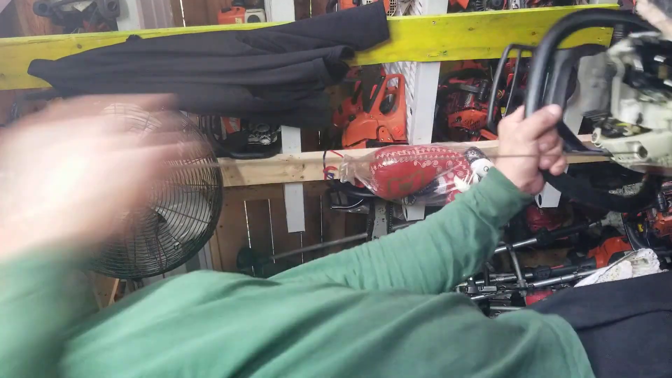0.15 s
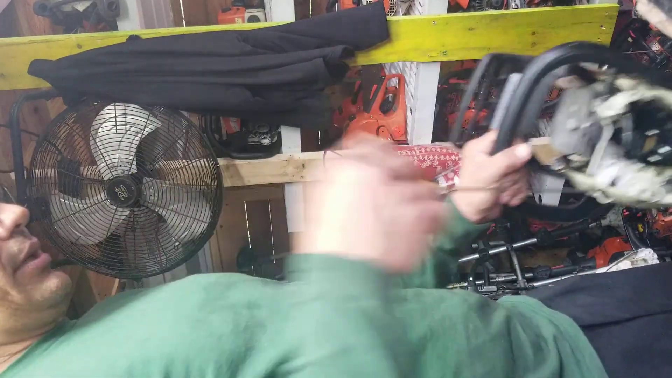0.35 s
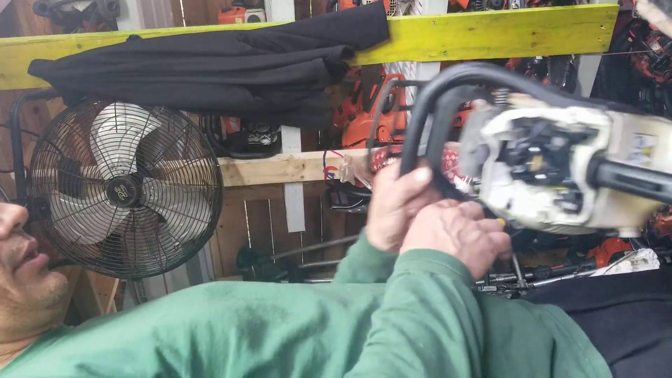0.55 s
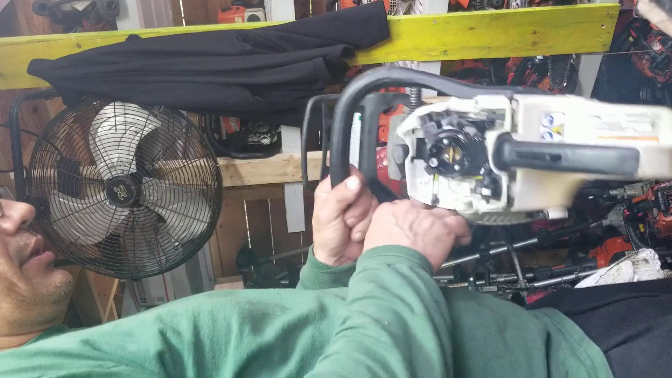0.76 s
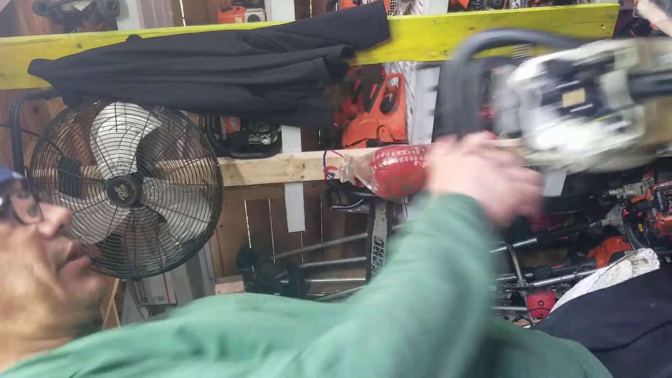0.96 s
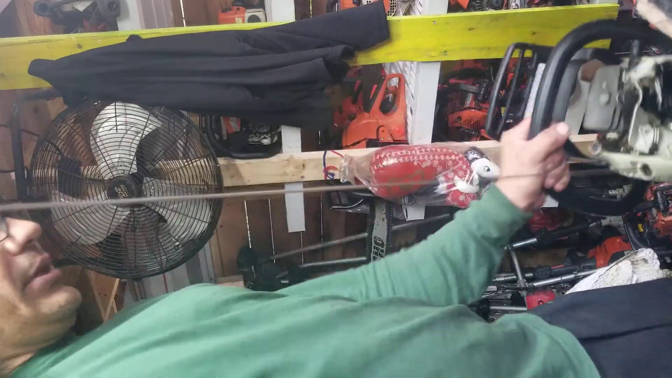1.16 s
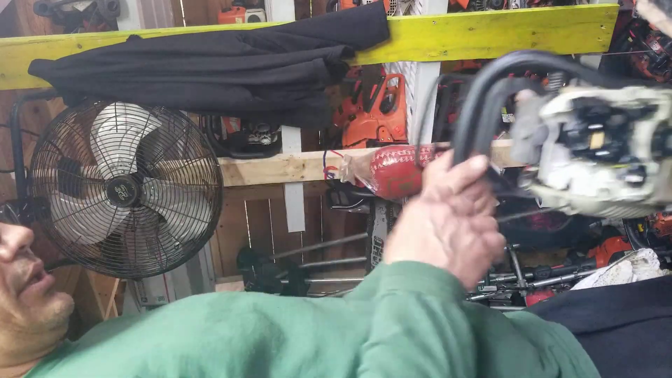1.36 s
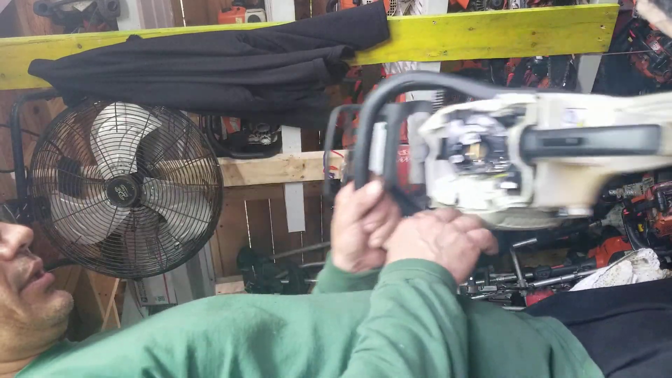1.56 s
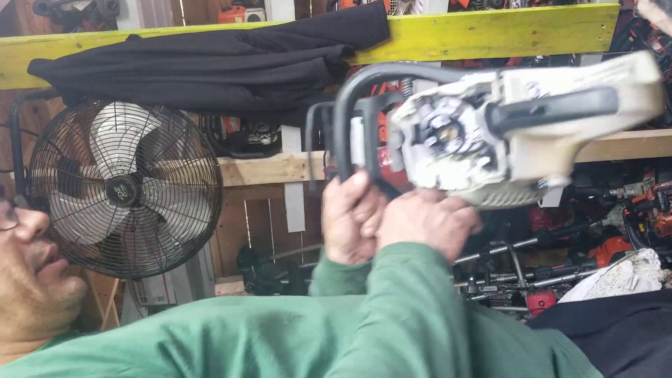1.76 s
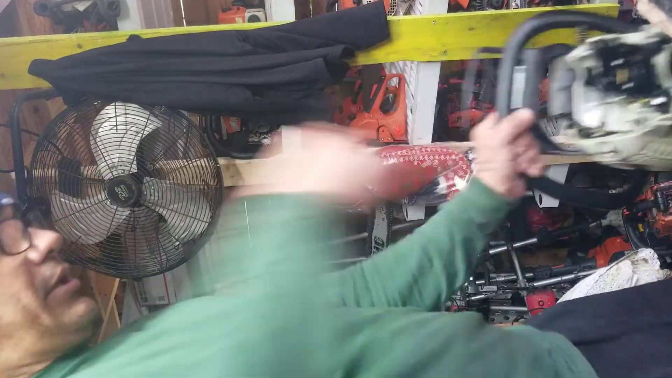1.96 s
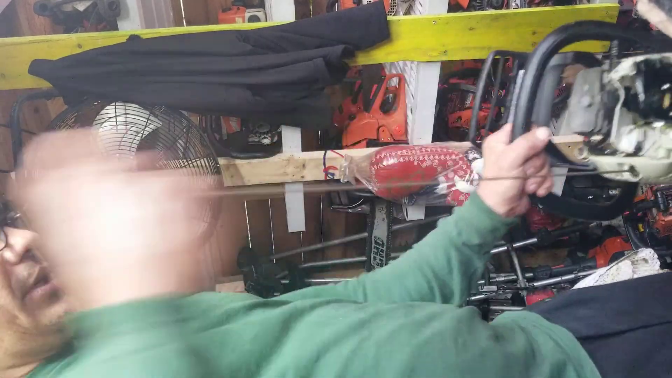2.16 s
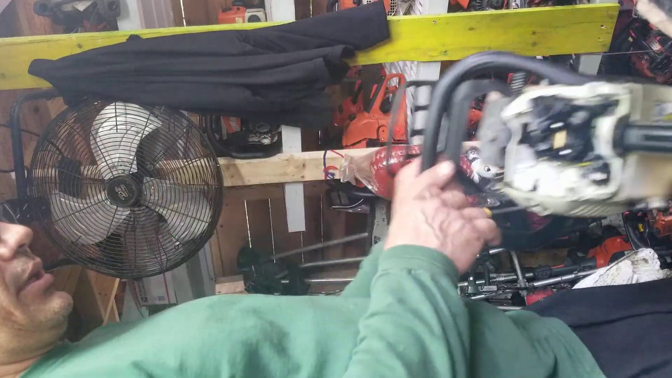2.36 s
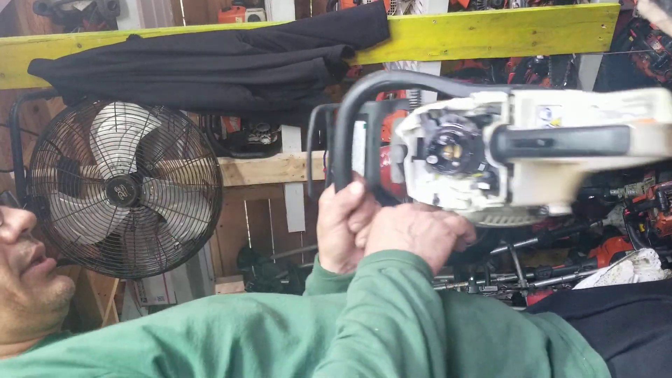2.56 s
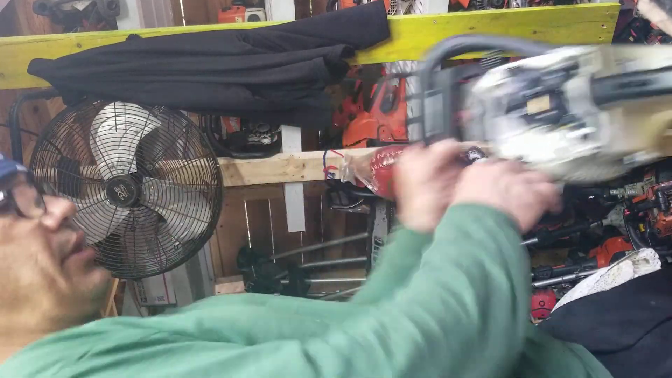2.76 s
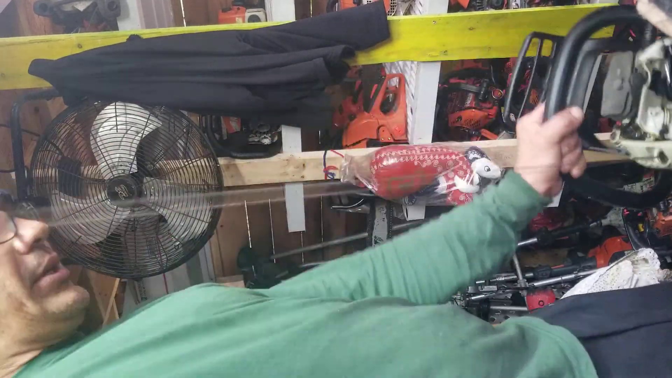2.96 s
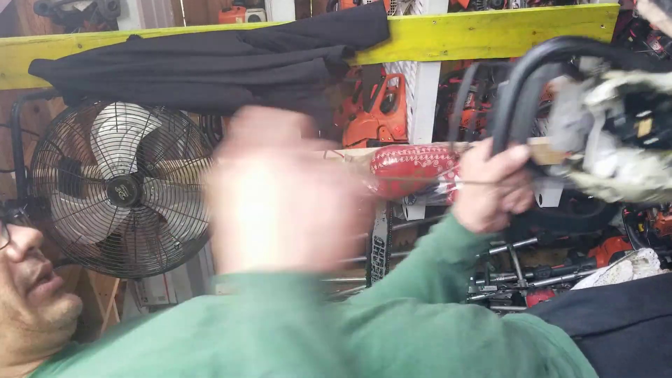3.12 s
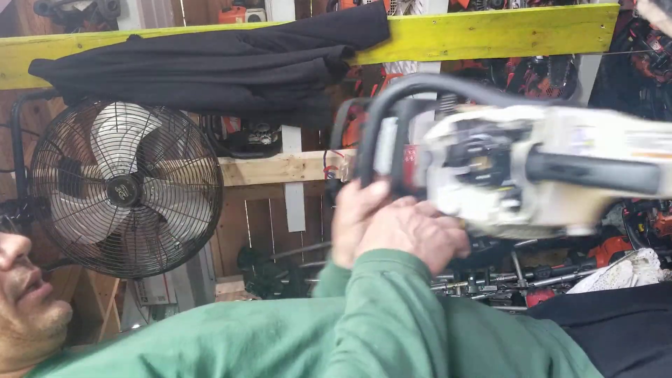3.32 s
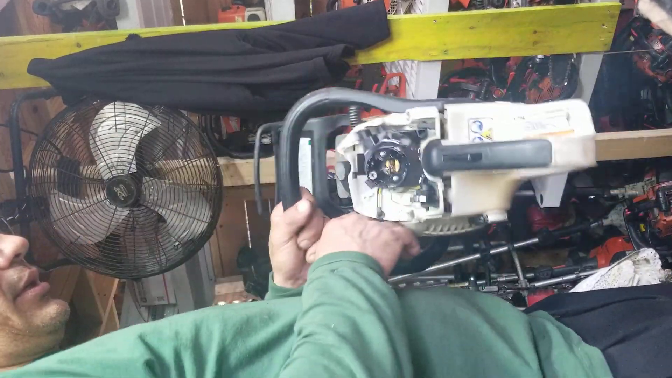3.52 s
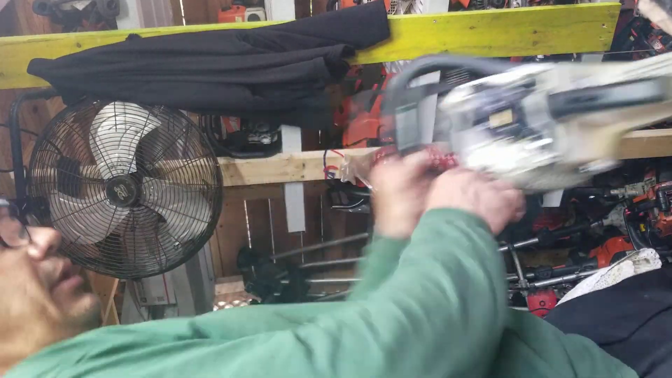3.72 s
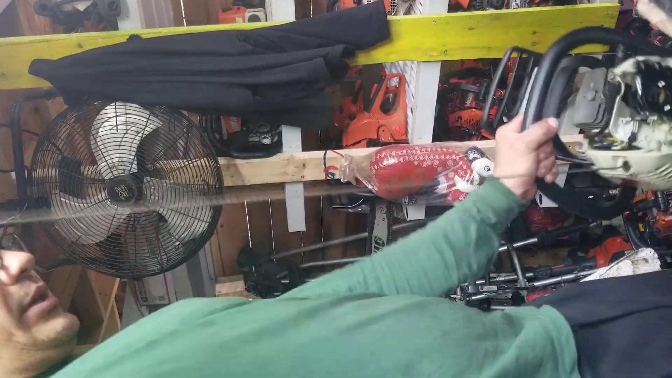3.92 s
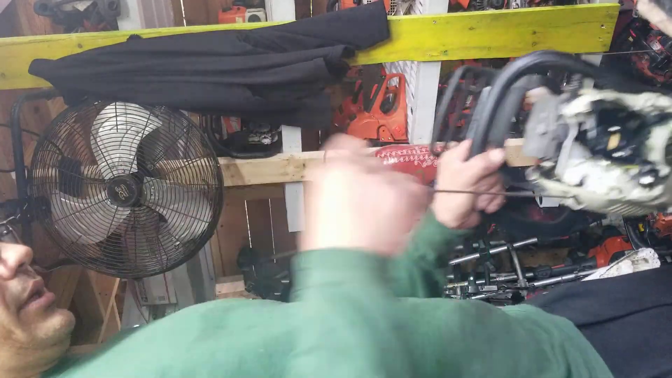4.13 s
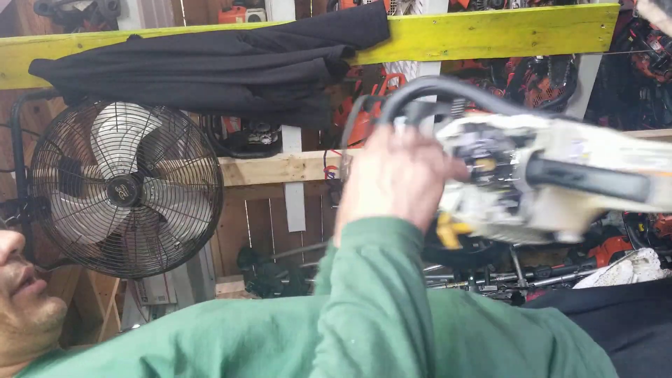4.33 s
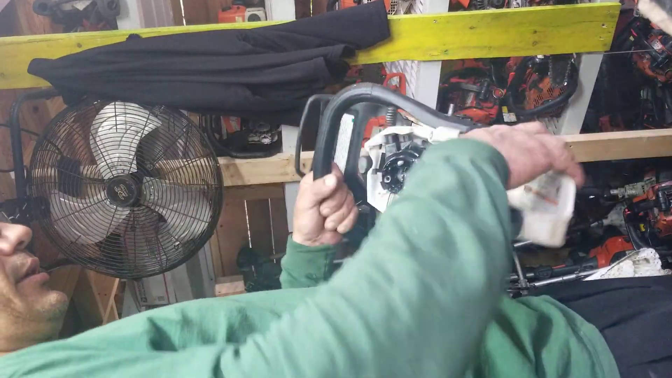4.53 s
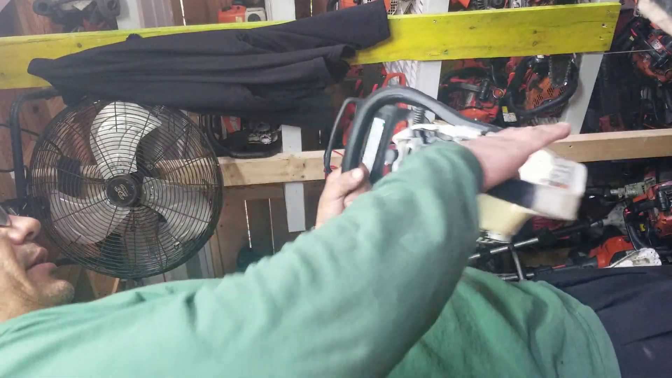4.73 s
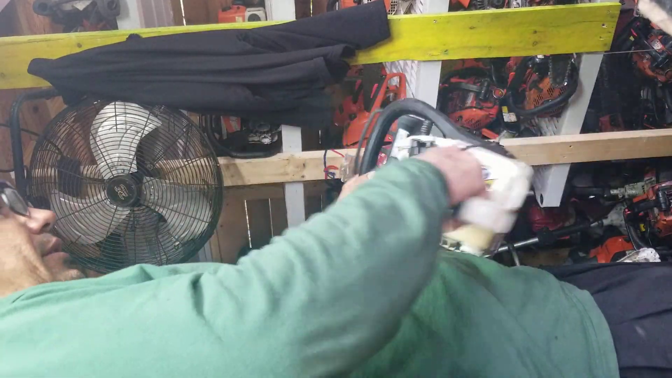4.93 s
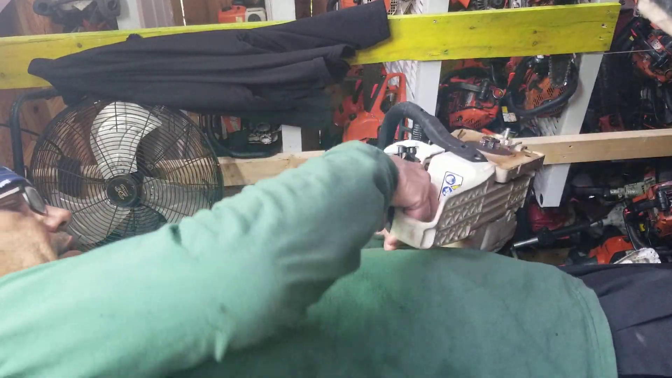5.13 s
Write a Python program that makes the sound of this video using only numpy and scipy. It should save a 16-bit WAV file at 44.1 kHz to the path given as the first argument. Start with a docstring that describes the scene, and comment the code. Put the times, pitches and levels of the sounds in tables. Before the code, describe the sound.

Close in a small, cluttered workshop, a hand-held chainsaw's pull cord is yanked five times, nearly once a second. Each pull clicks, rasps loudly over several fast dull puffs, then the cord whirs back and the handle knocks lightly. The engine never catches. The last rewind ends in a loud plastic crack, then faint handling over low room rumble.

```python
"""Over workshop rumble, hiss and hum, a held-up chainsaw has its starter rope yanked five times; it never fires.
Each pull opens with ticks and catches of the pawls (ringing noise bursts), then a rasp of rope and flywheel
(dense tiny impacts) over six piston puffs (slugs of air through a muffler); the recoil reel whirs down
(grains in a gliding resonance) and the handle knocks home (noise bursts). Hands touch the saw after the first pull;
after the last, the let-go handle cracks against the housing and the hands shift again."""
import sys
import numpy as np
from scipy import signal
from scipy.fft import rfft, irfft
from scipy.io import wavfile
from scipy.ndimage import uniform_filter1d

SR = 44100
rng = np.random.default_rng(int(sys.argv[2]) if len(sys.argv) > 2 else 0)


def waveform_to_disk(signal):
    """Save audio, clipped to [-1, 1], as 16-bit WAV at the path in sys.argv[1]."""
    frames = np.transpose(np.atleast_2d(signal))
    scaled = np.clip(frames, -1, 1) * 32767
    samples = np.round(scaled).astype(np.int16)
    wavfile.write(sys.argv[1], SR, samples)


N = 228627
TIME = np.arange(N) / SR

# colour of the workshop air: f/Hz, density/(dB per Hz)
AIR = [(20, -23), (40, -11), (65, 4.5), (90, 4.5), (120, 5.5), (175, -4), (280, 1.5), (450, -0.5),
       (950, 2.5), (1500, -1), (2500, -10), (6800, -12), (9000, -24), (12000, -14.5), (15800, -40.5)]
# low rumble before its waver: t/s, level/dB
RUMBLE_LEVEL = [(0, -47.5), (0.65, -49), (0.85, -56.5), (1.6, -48), (3.3, -48), (4.3, -51), (4.82, -57)]
# faint hum tones: f/Hz, level/dB
HUM = [(123.8, -74), (240, -67.5), (339.1, -74), (586.8, -73), (3042, -79), (6848, -82.5)]
# likeness of left and right in diffuse sound: f/Hz, likeness (1 = identical)
LIKENESS = [(100, 0.98), (300, 0.93), (700, 0.078), (1500, 0.014), (8000, 0.19)]
# decay of the room: f/Hz, t60/s
ROOM = [(150, 0.44), (400, 0.23), (1000, 0.084), (4000, 0.13), (14000, 0.066)]
# balance of the small bright sounds: f/Hz, left minus right level/dB
SIDES = [(500, 0), (1200, 1.5), (2200, 4), (5000, 2), (7000, 0), (10000, -3), (12500, -6), (15500, -7.5)]
# pawl catches, one row a pull: t/s, level/dB, brightness/(dB per octave), t60/s,
# then the second pawl's lag/s, level/dB, brightness/(dB per octave)
PAWLS = [(0.0202, -21, -3.5, 0.14, 0.012, -23.5, 1), (0.9315, -30, -4, 0.067, 0.017, -23, -1),
         (1.8775, -23.5, -2.5, 0.22, 0.0056, -22, 1), (2.7762, -24.5, -1, 0.11, 0.013, -19.5, 0),
         (3.7255, -31.5, -3, 0.22, 0.028, -27.5, -3.5)]
# colour of a pawl catch: f/Hz, density/(dB per Hz)
PAWL_COLOUR = [(300, -20), (800, -7), (1250, 1), (1550, -7), (2050, -8), (2800, -15), (4200, -13),
               (6800, -14.5), (8800, -21), (12500, -11), (15800, -21)]
# rope pulls, one row each: end of the arm's stroke t/s, rasp level/dB, rope hiss level/dB,
# slack level/dB, rewinding time/s, flywheel singing t/s, singing level/dB relative to the rasp
PULLS = [(0.199, -22.5, -27.5, -6, 0.38, 0.13, -22), (1.123, -25, -30, -3.5, 0.51, 1.06, -4.5),
         (2.055, -21.5, -26.5, -11, 0.47, 1.98, -4), (2.956, -21.5, -26.5, -3, 0.48, 2.9, -12),
         (3.913, -21, -26.5, -9.5, 0.59, 3.86, -1.5)]
# colour of the rasp: f/Hz, density/(dB per Hz)
RASP_COLOUR = [(250, -38.5), (600, -2), (1200, 3), (1600, 1.5), (2500, -3), (3200, 0.5), (3550, -1),
               (4600, -2.5), (5300, -5), (6400, -8.5), (7100, -1.5), (7800, -8), (8500, -12),
               (11000, -27.5)]
# colour of the rope hiss: f/Hz, density/(dB per Hz)
ROPE_COLOUR = [(6000, -46), (8400, -25.5), (9100, -10.5), (10600, -6.5), (12800, 0.5), (14200, -6),
               (15700, -5)]
# flywheel modes: f/Hz, nominal width/Hz, level/dB relative to each other
FLYWHEEL = [(3130, 90, -11.5), (3762, 60, -4), (3895, 16, 7), (5260, 60, -14)]
# crank, one row a pull: first puff t/s, first puff's level/dB relative to normal, first speed f/Hz,
# speed gain/(Hz per turn), coasting speed f/Hz, muffler bass level/dB
CRANKS = [(0.0532, -12, 26.16, 2.44, 27.86, 2), (0.9849, -5, 28.35, 2.04, 28.65, -20),
          (1.9276, -0.5, 27.16, 1.6, 24.2, 1), (2.8342, -0.4, 28.66, 1.5, 26.8, 0),
          (3.783, -3.5, 29.73, 1.97, 31.58, -2)]
# colour of the muffler: f/Hz, level/dB
MUFFLER = [(50, -14.5), (110, 3), (170, 6.5), (260, 3), (450, 4.5), (700, 1), (1000, 1.5), (1600, 8)]
# the puff off nearby surfaces: left delay/s, left gain, right delay/s, right gain
ECHOES = [(0.00143, 0.31, 0.00133, 0.38), (0.00366, 0.57, 0.00348, 0.57), (0.00503, 0.23, 0.00447, 0.19),
          (0.00564, -0.19, 0.00624, 0.72), (0.00625, 0.3, 0.00811, 0.53), (0.0077, 0.13, 0.00998, -0.4),
          (0.00971, -0.34, 0.01217, 0.26), (0.01166, 0.34, 0.01329, -0.33), (0.01235, 0.24, 0.01488, -0.23),
          (0.0158, 0.3, 0.01765, -0.19), (0.01862, 0.16, 0.02046, 0.13), (0.02013, 0.12, 0.02345, 0.15),
          (0.02327, 0.16, 0.02439, -0.15)]
# standing waves between floor and walls: f/Hz, width/Hz, level/dB
BOOM = [(166.6, 29, 2), (263.5, 25, -18.5)]
# rewinding reel, before its overall trim: top speed t/s, whir there f/Hz, level/dB, slowing time/s,
# settling squeak level/dB
REELS = [(0.331, 2530, -39.5, 0.055, -53), (1.239, 2520, -43.5, 0.075, -71), (2.183, 2490, -36, 0.068, -70),
         (3.117, 2400, -40.5, 0.067, -57), (4.108, 2790, -41.5, 0.063, -54)]
# handle meeting the housing and bouncing: t/s, level/dB, brightness/(dB per octave), t60/s
HANDLE = [(0.6268, -31.5, -22.5, 0.02), (1.5152, -33.5, -8, 0.069), (1.538, -40.5, -7.5, 0.09),
          (2.4918, -48, -3, 0.053), (2.503, -45, -1, 0.093), (3.3319, -35, -8.5, 0.063),
          (3.3525, -30.5, -13, 0.1), (4.257, -12.5, 1, 0.098), (4.2605, -19.5, 5, 0.038)]
# colour of the housing: f/Hz, density/(dB per Hz)
HOUSING = [(120, -15), (230, -18.5), (600, -12.5), (1000, 5.5), (1600, 3), (2000, -0.5), (2700, 4.5),
           (3300, -2.5), (4800, 0.5), (6200, -4.5), (7800, -5.5), (9500, -16.5), (13000, -9), (15800, -14)]
# hands shifting on the saw: t/s, level/dB, brightness/(dB per octave), t60/s
TOUCHES = [(0.72, -53.5, 9.5, 0.36), (4.4479, -47, 2, 0.16), (4.5477, -44, -10, 0.073),
           (4.6504, -52, 7, .2), (4.9981, -54, 5.5, .06), (5.1109, -55.5, -2, .06)]
# colour of a touch: f/Hz, density/(dB per Hz)
TOUCH_COLOUR = [(200, -8), (480, 11.5), (800, -9), (2000, -12), (5000, -28), (15000, -34.5)]

# faint tick before each first catch (level relative to it), and the second pawl's ring
SWING_S, SWING_DB, SWING_T60 = 0.017, -15.5, 0.15
SECOND_T60 = 0.043
# the rope runs out at full speed, gets there, and slows as it comes home
STROKE_S, RISE_S, HOMING_S = 0.1253, 0.042, 0.05
EASE_DB, EASE_S = -4, 0.11  # the arm eases off around the end of each stroke
SWELL_S, SWELL_DB = 0.039, 3  # the rasp grows this much as the crank gets going
SING_S, SING_BASE_DB = 0.042, -15  # the flywheel's swell (to 1/e either side) over a faint steady ring
DRIVEN_TURNS, STALL_HZ = 3, 21.95  # a turn against compression uses up the energy of the stall speed
PUFF_DB, PUFF_AT_HZ, PUFF_DB_PER_OCTAVE = -2, 32, 10.5  # a faster crank puffs harder
CHUFF_T60 = 0.052
SPIN_UP_S, REEL_END_HZ = 0.17, 1150  # the whir arches up from and back down to a crawl
REEL_LEAD_S, REEL_RUN_S, REEL_FADE_DB_PER_S = 0.08, 0.22, 110  # heard around top speed, fading either way
SQUEAK_AFTER, SQUEAK_S = 1.65, 0.024  # low squeak: delay in slowing times, swell to 1/e either side
EDGE_HZ = 15850


def gain_of(db):
    """Decibels to an amplitude factor."""
    return 10 ** (np.asarray(db) / 20)


def evened(x):
    """Scales to rms 1."""
    return x / np.sqrt(np.mean(x ** 2) + 1e-20)


def read(points, hz):
    """Reads a table on a log-frequency axis."""
    f, value = np.transpose(points)
    return np.interp(np.log(hz + 1), np.log(f + 1), value)


def level(start, end, db):
    """Decibels as a gain for every sample, silent outside a span with softened edges."""
    inside = (TIME >= start) * (TIME <= end)
    return uniform_filter1d(gain_of(db) * inside, size=64)


def add(mix, s, sound):
    """Mixes a sound in at time s."""
    part = mix[max(round(s * SR), 0):][:len(sound)]
    part += sound[:len(part)]


def coloured(x, points, tilt_db=0):
    """Causal minimum-phase filter with a given spectrum and a treble tilt per octave above 1500 Hz."""
    hz = abs(np.fft.fftfreq(4096, 1 / SR))
    octaves = np.log2(np.maximum(hz / 1500, 1))
    db = np.maximum(read(points, hz) + tilt_db * octaves, -100)
    spectrum = np.exp(np.conj(signal.hilbert(np.log(gain_of(db)))))
    taps = np.fft.ifft(spectrum).real[:2048]
    return signal.oaconvolve(x, taps)[:len(x)]


def resonate(x, hz, width):
    """A resonance of gain 1, fixed or moving: shift down to 0 Hz, smooth, shift back up."""
    turn = np.exp(2j * np.pi * np.cumsum(hz * np.ones(len(x))) / SR)
    r = np.exp(-np.pi * width / SR)
    smooth = signal.lfilter([1 - r], [1, -r], x / turn + 1e-18)
    return 2 * (turn * smooth).real


def drift(per_s):
    """A slow random curve of rms 1, with little movement faster than per_s."""
    t = np.arange(8192) / 1500
    rate = np.fft.rfftfreq(len(t), t[1])
    slow = irfft(rfft(rng.standard_normal(len(t))) / (1 + (rate / per_s) ** 4))
    return evened(np.interp(TIME, t, slow))


def grains(per_s, spread_db):
    """Tiny random impacts of uneven size."""
    size = gain_of(spread_db * np.minimum(rng.exponential(1, N), 4))
    struck = rng.random(N) < per_s / SR
    return evened(size * rng.choice([-1, 1], N) * struck)


def tail(x, start_s, shorten=1):
    """Diffuse two-channel sound of the room: each band dies at its own speed, the bass alike in both."""
    hz, t, z = signal.stft(rng.standard_normal((2, SR // 2)), SR, nperseg=256)
    same = np.clip(read(LIKENESS, hz), -1, 1)[:, None]
    z = np.array([z[0], same * z[0] + np.sqrt(1 - same ** 2) * z[1]])
    decay = gain_of(-60 * t / (shorten * read(ROOM, hz)[:, None]))
    taps = signal.istft(z * decay, SR, nperseg=256)[1]
    taps *= np.clip(np.arange(taps.shape[1]) / SR / start_s - 1, 0, 1)  # silent until start_s
    taps /= np.linalg.norm(taps, axis=1, keepdims=True)
    return signal.oaconvolve(x[None], taps, axes=1)[:, :N]


def placed(x, near_db, room_db, shift_per_s=7, count=5):
    """Small bright sounds reach the left first, scatter off nearby clutter and fill the room."""
    direct = np.array([x, np.roll(x, 22)])  # right lags by 22 samples
    # several scattered copies fade randomly in and out, so the colour keeps shifting
    shares = np.array([drift(per_s=shift_per_s) for _ in range(count)])
    shares /= np.linalg.norm(shares, axis=0)
    near = sum(tail(x * share, start_s=0.00059, shorten=0.32) for share in shares)
    both = direct + gain_of(near_db) * near + gain_of(room_db) * tail(x, start_s=0.017)
    both /= np.sqrt(1 + gain_of(near_db) ** 2 + gain_of(room_db) ** 2)
    side = read(SIDES, np.fft.rfftfreq(N, 1 / SR)) / 2
    return irfft(rfft(both) * gain_of([side, -side]), N)


def knocks(rows, colour, crack_db, crack_t60):
    """Each blow is coloured noise with a short crack and a dying rattle, tilted by its brightness."""
    t, x = np.arange(SR // 4) / SR, np.zeros(N)
    for s, db, tilt_db, t60 in rows:
        decay = gain_of(-60 * t / t60) + gain_of(crack_db - 60 * t / crack_t60)
        blow = coloured(decay * rng.standard_normal(len(t)), colour, tilt_db)
        blow *= np.linalg.norm(decay) / np.linalg.norm(blow)  # colour leaves the energy alone
        add(x, s, gain_of(db) * blow)
    return x


def workshop(waver_db=2, hiss_db=-62):
    """Air noise split into a wavering low rumble and a steady thin hiss, with faint unsteady hum tones."""
    hz = np.fft.rfftfreq(N, 1 / SR)
    a, b = rfft(rng.standard_normal((2, N)))
    same = np.clip(read(LIKENESS, hz), -1, 1)
    z = np.array([a, same * a + np.sqrt(1 - same ** 2) * b]) * gain_of(read(AIR, hz))
    low = 1 / (1 + (hz / 260) ** 2)
    rumble_db = np.interp(TIME, *np.transpose(RUMBLE_LEVEL)) + waver_db * drift(per_s=8.6)
    rumble = evened(irfft(z * low, N)) * gain_of(rumble_db)
    hiss = gain_of(hiss_db) * evened(irfft(z * (1 - low), N))
    hum = np.zeros(N)
    for f, db in HUM:
        wandering_hz = f + (2 + f / 500) * drift(per_s=33.0)
        hum += gain_of(db) * evened(np.sin(2 * np.pi * np.cumsum(wandering_hz) / SR))
    return rumble + hiss + hum


def pawls():
    """The pawls swing out with a tick, then one after the other bites into the flywheel."""
    blows = []
    for s, db, tilt_db, t60, lag, second_db, second_tilt_db in PAWLS:
        blows += [(s - SWING_S, db + SWING_DB, tilt_db, SWING_T60),
                  (s, db, tilt_db, t60),
                  (s + lag, second_db, second_tilt_db, SECOND_T60)]
    catches = knocks(blows, PAWL_COLOUR, crack_db=1, crack_t60=0.008)
    return placed(catches, near_db=0, room_db=-6, shift_per_s=50, count=3)


def stroke(catch, end, slack_db, rewind_s, fall_db_per_s, rewind_db, rewind_db_per_s):
    """Gain over one pull: slack is taken up, the stroke holds, then dies down into the quiet rewinding."""
    slack = np.clip((end - STROKE_S - TIME) / RISE_S, 0, 1)
    after = np.maximum(TIME - end, 0)
    dying = np.maximum(-fall_db_per_s * after, rewind_db - rewind_db_per_s * after)
    homing = np.clip((rewind_s - after) / HOMING_S, 0, 1)
    return homing * level(catch, end + rewind_s, slack_db * slack + dying)


def singing(x, hz, width, steadiness=0.58):
    """A mode kept going by rubbing: its swing is evener than the impacts that feed it."""
    ring = resonate(resonate(x, hz, 2 * width), hz, 2 * width)
    power = abs(uniform_filter1d(ring ** 2, size=200)) + 1e-12
    return evened(ring / power ** (steadiness / 2))


def starter(clatter_db=-1):
    """Rope, pawls and flywheel rasp in dense tiny impacts, which also ring the flywheel."""
    force, slide, sing = np.zeros((3, N))
    for (catch, *_), (end, force_db, slide_db, slack_db, rewind_s, sing_s, sing_db) in zip(PAWLS, PULLS):
        easing = EASE_DB * np.exp(-((TIME - end) / EASE_S) ** 2)
        swelling = SWELL_DB * (np.clip((TIME - end + STROKE_S) / SWELL_S, 0, 1) - 1)
        rasp_shape = stroke(catch, end, slack_db - 6, rewind_s,
                            fall_db_per_s=164.5, rewind_db=-25.5, rewind_db_per_s=45)
        rope_shape = stroke(catch, end, slack_db - 15, rewind_s,
                            fall_db_per_s=224, rewind_db=-16, rewind_db_per_s=49.5)
        force += gain_of(force_db + swelling + easing) * rasp_shape
        slide += gain_of(slide_db) * rope_shape
        sing += gain_of(sing_db) * np.exp(-((TIME - sing_s) / SING_S) ** 2)
    flutter = gain_of(1.4 * drift(per_s=130))
    fine = grains(per_s=9700, spread_db=0.5)
    clatter = gain_of(clatter_db) * grains(per_s=600, spread_db=1.0)
    impacts = evened(fine + clatter) * flutter
    rasp = force * evened(coloured(impacts, RASP_COLOUR))
    fibres = grains(per_s=54000, spread_db=-17)  # above SR: one impact on every sample
    rope = slide * evened(coloured(impacts + fibres, ROPE_COLOUR))
    ring = evened(sum(gain_of(db) * singing(impacts, hz, width) for hz, width, db in FLYWHEEL))
    ring *= force * (gain_of(SING_BASE_DB) + sing)
    return placed(rasp + rope + ring, near_db=6.0, room_db=-5, shift_per_s=12, count=5)


def crank(first_hz, gain_hz, coast_hz):
    """Speed of each turn: the rope speeds the crank up, then it coasts until compression stops it."""
    driven = first_hz + gain_hz * np.arange(DRIVEN_TURNS)
    last_hz = np.sqrt(max(coast_hz ** 2 - STALL_HZ ** 2, 1))
    return np.append(driven, [coast_hz, last_hz])


def piston(open_s=0.00045, shut_s=0.00038, suction=0.18, chuff_db=-22.5, room_db=-15):
    """Each turn sucks briefly, then pushes a slug of air through the muffler; pressure is the flow's slope."""
    u = np.arange(-220, 2000) / SR
    width = np.where(u < 0, open_s, shut_s)
    push = -u / width * np.exp(-.5 * (u / width) ** 2)
    push -= suction * np.exp(-.5 * ((u + 0.002) / 0.00074) ** 2)
    push = signal.sosfilt(signal.butter(2, 110, "high", fs=SR, output="sos"), push)
    chuff_colour = [(100, 14.5), (300, -20.5), (800, 6.5), (1500, -22), (5000, -37.5)]  # f/Hz, level/dB
    x, bass = np.zeros(N), np.ones(N)
    for start, weak_db, first_hz, gain_hz, coast_hz, bass_db in CRANKS:
        turns = crank(first_hz, gain_hz, coast_hz)
        speed = (np.append(first_hz, turns) + np.append(turns, 0)) / 2  # around each puff
        loud = PUFF_DB + PUFF_DB_PER_OCTAVE * np.log2(speed / PUFF_AT_HZ)
        loud[0] += weak_db
        bass[TIME >= start - STROKE_S] = gain_of(bass_db)  # changes between pulls with how the saw is held
        moments = start + np.append(0, np.cumsum(1 / turns))
        for s, db in zip(moments, loud):
            # the escaping air leaves a short turbulent chuff
            chuff = evened(coloured(rng.standard_normal(len(u)), chuff_colour))
            chuff *= (u > 0) * gain_of(chuff_db - 60 * abs(u) / CHUFF_T60)
            add(x, s + u[0], gain_of(db) * (push + chuff))
    x = coloured(x, MUFFLER)
    x += (bass - 1) * resonate(x, 154, 69.4)
    out = np.array([x, x])
    for left_s, left, right_s, right in ECHOES:
        add(out[0], left_s, left * x)
        add(out[1], right_s, right * x)
    boom = sum(gain_of(db) * resonate(out.mean(0), hz, w) for hz, w, db in BOOM)
    return out + boom + gain_of(room_db) * tail(x, start_s=0.0054)


def reel(width_hz=260, overtone_db=-11, trim_db=-5):
    """The spring spins the reel up, then the rope slows it: a fuzzy whir that wobbles, flutters and falls."""
    hz, loud = np.full(N, float(REEL_END_HZ)), np.zeros(N)
    for s, top_hz, db, slowing_s, squeak_db in REELS:
        u = TIME - s
        hz += (top_hz - REEL_END_HZ) * np.exp(-(u / np.where(u < 0, SPIN_UP_S, slowing_s)) ** 2)
        loud += gain_of(squeak_db) * np.exp(-((u - SQUEAK_AFTER * slowing_s) / SQUEAK_S) ** 2)
        loud += level(s - REEL_LEAD_S, s + REEL_RUN_S, db - REEL_FADE_DB_PER_S * abs(u))
    hz *= 1 + 0.055 * drift(per_s=22)
    loud *= evened(gain_of(2.5 * drift(per_s=30)))
    rubbing, whir = grains(per_s=1600, spread_db=2.5), np.zeros(N)
    for k, db in enumerate((0, overtone_db), 1):
        once = resonate(rubbing, k * hz, k * width_hz)
        whir += gain_of(db) * evened(resonate(once, k * hz, k * width_hz))
    return placed(gain_of(trim_db) * loud * whir, near_db=6, room_db=-6, count=3)


def handle():
    """The handle strikes the plastic and metal housing and bounces: cracks with a dying rattle."""
    blows = knocks(HANDLE, HOUSING, crack_db=1.5, crack_t60=0.0083)
    return placed(blows, near_db=2, room_db=-7, shift_per_s=70)


def touches():
    """Hands shift on the saw: faint coloured bursts, each with a very short crack at its start."""
    blows = knocks(TOUCHES, TOUCH_COLOUR, crack_db=5, crack_t60=0.0055)
    return placed(blows, near_db=7.0, room_db=-16, count=2)


def scene():
    """The workshop, the saw and the hands on it."""
    return workshop() + pawls() + starter() + piston() + reel() + handle() + touches()


def record(dry):
    """Clips at full scale and limits the band with a steep low-pass."""
    low_pass = signal.firwin(511, EDGE_HZ, window=("kaiser", 9), fs=SR)
    return signal.oaconvolve(np.clip(dry, -1, 1), low_pass[None], "same")


dry = scene()
out = record(dry)
waveform_to_disk(out)
```